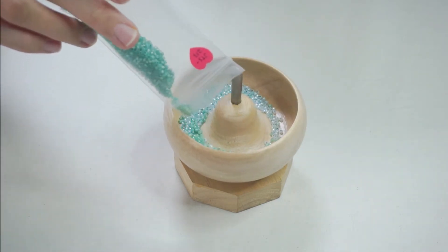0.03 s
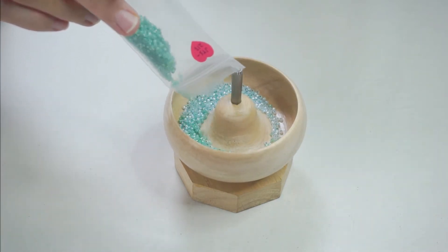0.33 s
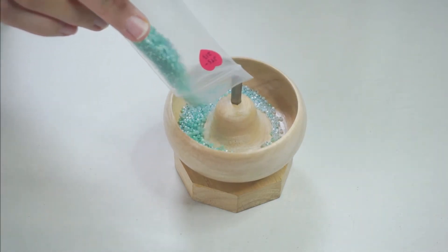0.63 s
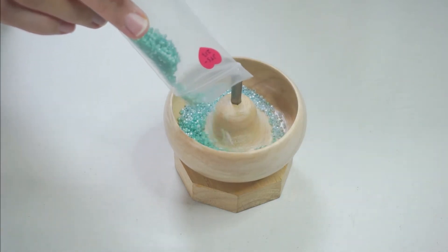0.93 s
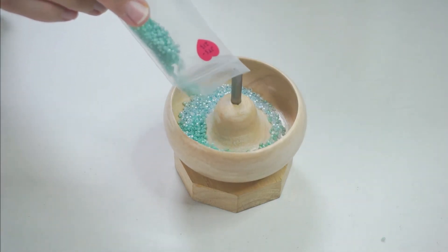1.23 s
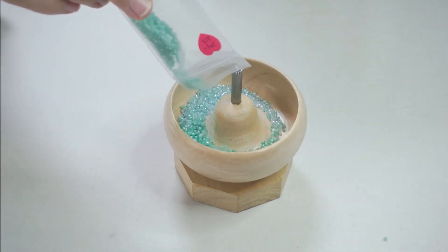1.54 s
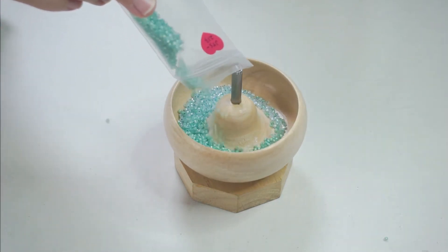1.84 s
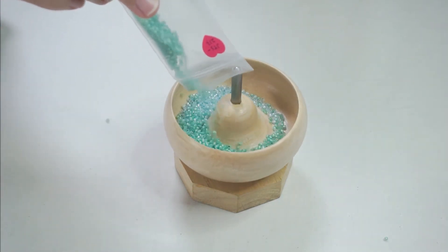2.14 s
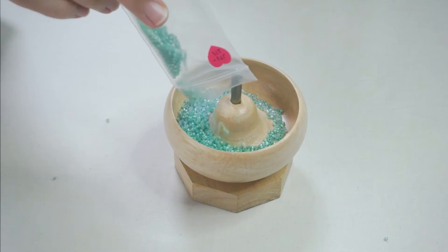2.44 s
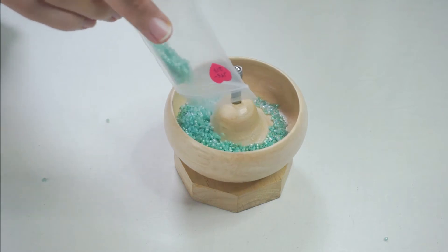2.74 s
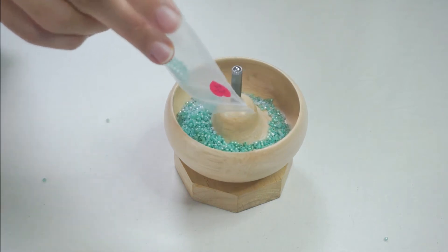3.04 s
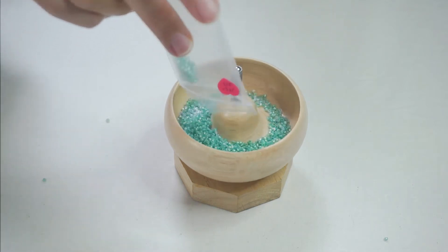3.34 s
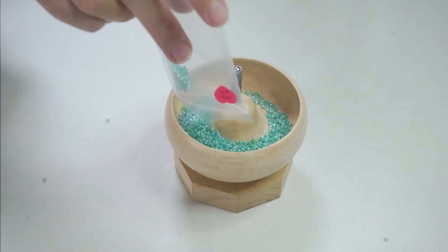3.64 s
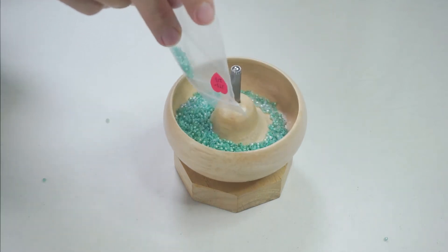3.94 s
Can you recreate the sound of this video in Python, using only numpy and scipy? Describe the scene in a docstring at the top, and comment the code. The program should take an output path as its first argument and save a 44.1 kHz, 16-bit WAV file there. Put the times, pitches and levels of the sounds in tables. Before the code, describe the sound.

Tiny glass beads knock on a wooden bowl and tick against each other, close to the microphone in a small room. A short pour leads to a longer one, which thins to scattered clicks and faint plastic bag crinkles.

```python
"""Glass beads poured into a wooden bowl.

Tiny beads fall from a plastic bag into a bowl on a spindle, close by in a small room. They knock on
the wood and tick against each other in two dense runs; the last are shaken out in small bunches while
the bag crinkles. Each contact rings wood or glass modes; two thin bowl tones linger underneath."""
import sys
import numpy as np
from scipy import signal
from scipy.fft import rfft, irfft, next_fast_len
from scipy.io import wavfile

SR = 44100
rng = np.random.default_rng(int(sys.argv[2]) if len(sys.argv) > 2 else 0)


def dump(signal):
    """Clip the signal to [-1, 1] and save it as 16-bit WAV at the path in sys.argv[1]."""
    limited = np.clip(np.atleast_2d(signal).T, -1, 1)
    pcm = np.round(limited * 32767).astype(np.int16)
    wavfile.write(sys.argv[1], SR, pcm)


N = 176400
TIME = np.arange(N) / SR
SIDES = np.array([[1], [-1]])  # left, right
STREAM_JOSTLE_DB, HIT_JOSTLE_DB = -4, -8.5


def from_db(db):
    """Decibels to gain."""
    return 10 ** (np.asarray(db) / 20)


def rms_one(x):
    """Scale to rms 1."""
    return x / np.sqrt(np.mean(x ** 2) + 1e-20)


def at_hz(table, hz, column=1):
    """Interpolate a table column over log frequency."""
    table = np.array(table)
    return np.interp(np.log(hz + 1), np.log(table[:, 0]), table[:, column])


def drift(rate_hz):
    """Smooth random wander, rms 1."""
    pole = np.exp(-2 * np.pi * rate_hz / SR)
    return rms_one(signal.lfilter([1], [1, -2 * pole, pole ** 2], rng.standard_normal(N + SR))[SR:])


def resonate(x, hz, width_hz):
    """Resonator that keeps the energy of a click."""
    radius = np.exp(-np.pi * width_hz / SR)
    feedforward = np.sqrt((1 - radius ** 2) / 2) * np.array([1, 0, -1])
    feedback = [1, -2 * radius * np.cos(2 * np.pi * hz / SR), radius ** 2]
    return signal.lfilter(feedforward, feedback, x + 1e-18)


def clicks(start_s, level_db):
    """Impulses; level is rms over 1 ms."""
    out = np.zeros(N)
    out[(start_s * SR).astype(int)] = from_db(level_db) * np.sqrt(SR / 1000)
    return out


def contacts(level_db, knocks_per_s=1700, ticks_per_s=2500, full_flow_db=-39, size_spread_db=3.5):
    """Random knock and tick impulses, rates given at full flow; more flow brings more and harder ones."""
    rate_share = 0.4  # part of a level change due to contact count
    flow = from_db(2 * rate_share * (level_db - full_flow_db))
    chance = np.clip(np.array([[knocks_per_s], [ticks_per_s]]) * flow / SR, 1e-5, 1)
    sizes = rms_one(from_db(size_spread_db * np.clip(rng.standard_normal(N), -2, 2)))
    sizes *= rng.choice([-1, 1], N)
    return (rng.random(N) < chance) * sizes * from_db(level_db) / np.sqrt(chance)


def jostle(drive, jostle_db, decay_s=0.0046):
    """Each contact briefly rattles the neighbouring beads."""
    pole = np.exp(-2 / (decay_s * SR))
    envelope = np.sqrt(signal.lfilter([1 - pole], [1, -pole], drive ** 2 + 1e-18))
    return drive + from_db(jostle_db) * envelope * rng.standard_normal(drive.shape)


def strike(train, modes, jostle_db, level_column=2, spread_db=3.5):
    """Contacts ring each mode at random strength. Output axes: shared/apart, left/right, time."""
    at = np.flatnonzero(train)
    out = np.zeros((2, 2, N))
    total = np.sqrt(sum(from_db(2 * mode[level_column]) for mode in modes))
    for k, mode in enumerate(modes):
        hz, width_hz, *_, fill_db_per_s, pan_db = mode
        draws = np.random.default_rng(rng.integers(2 ** 31)).standard_normal((len(at), 3))
        fill_db = fill_db_per_s * (TIME[at] - TIME[-1] / 2)  # timbre shifts as the bowl fills
        gain = (-1) ** k * from_db(mode[level_column] + fill_db) / total
        drive = np.zeros((2, N))
        drive[:, at] = gain * train[at] * rms_one(from_db(spread_db * draws[:, :2].T))
        drive[1, at] *= np.sign(draws[:, 2])  # decorrelates apart from shared
        ring = resonate(jostle(drive, jostle_db), hz, width_hz)
        ring = signal.lfilter(*signal.butter(2, hz / 2, "high", fs=SR), ring)
        out += ring[:, None] * rms_one(from_db(SIDES * pan_db / 2))
    return out


def wood_knocks(stream, landings, tap_top_hz=3400):
    """Beads knock on the bowl; soft taps ring only its low modes."""
    # bowl modes: pitch_hz, width_hz, stream_db, landing_db, fill_db_per_s, pan_db
    modes = [(372, 113, -29, -27.5, 0, 1), (486, 100, -24.5, -29, -0.5, 2), (928, 95, -14, -25, -0.7, 3),
             (1410, 138, -4.5, -17, -1, 4), (1780, 290, -2.5, -2.5, -0.5, 0),
             (2047, 266, 0.4, -0.5, 0.4, 1), (2460, 560, 1.55, 0.5, -0.5, 1.5),
             (3080, 510, -0.1, -9, 0.26, 6), (3945, 450, -3.5, -11, 0, 3), (4896, 820, -0.5, 1, 0.46, 6.5),
             (5510, 670, 0, 0.5, 0.63, 3.5), (6380, 670, -4, -1, -0.5, 6), (8170, 470, -5.5, -6, -0.5, 1)]
    # soft taps: start_s, level_db
    taps = [(3.57, -46), (3.678, -42), (3.690, -38.5), (3.7822, -38), (3.8862, -48), (3.9232, -45),
            (3.9659, -51), (3.9827, -37)]
    low_modes = [mode for mode in modes if mode[0] < tap_top_hz]
    tapped = strike(clicks(*np.transpose(taps)), low_modes, HIT_JOSTLE_DB, level_column=3)
    poured = strike(stream, modes, STREAM_JOSTLE_DB)
    return tapped + poured + strike(landings, modes, HIT_JOSTLE_DB, level_column=3)


def glass_ticks(stream, landings):
    """Bead hits bead and rings short, high modes."""
    # glass modes: pitch_hz, width_hz, level_db, fill_db_per_s, pan_db
    modes = [(7800, 3500, -1, 0, 1), (8560, 166, -4.5, -0.5, 1), (9040, 350, -1.5, -0.35, 2),
             (10020, 840, -3, -1, 4), (10540, 790, -2.5, -0.8, 3.5), (11400, 490, -4, 1.1, -1),
             (12840, 1160, -0.5, 1, 6), (14000, 980, -5.5, 1, 0), (15500, 2200, -3.5, 1, -9)]
    return strike(stream, modes, STREAM_JOSTLE_DB) + strike(landings, modes, HIT_JOSTLE_DB)


def bowl_colour(x):
    """The bowl radiates with narrow ringing peaks and dark gaps."""
    # peaks and gaps: centre_hz, width_hz, gain_db
    resonances = [(1260, 40, 4), (1472, 39, -3.5), (1643, 25, -3.5), (1697, 43, 4.5), (1762, 31, -11.5),
                  (1781, 28, 5.5), (1880, 20, 3), (2005, 35, 2), (2884, 19, 1), (2987, 37, 4),
                  (3846, 56, 3), (4204, 165, -6), (8830, 120, -1.5), (10775, 90, 3.5)]
    for hz, width_hz, db in resonances:
        zero_b, zero_a = signal.iirpeak(hz, hz / (width_hz * from_db(db / 2)), SR)
        pole_b, pole_a = signal.iirpeak(hz, hz / (width_hz * from_db(-db / 2)), SR)
        x = signal.lfilter(zero_a / (1 - zero_b[0]), pole_a / (1 - pole_b[0]), x)
    return x


def microphones(shared, apart):
    """Partly coherent pair; the right one hears the bowl slightly earlier."""
    # stereo image: frequency_hz, coherence, left_lag_rad
    image = [(200, 1, 0.27), (720, 0.65, 2.42), (1390, 0.96, 1.37), (2040, 0.89, 0.25), (2730, 0.99, 0.41),
             (3270, 0.44, 1.96), (4270, 0.19, 2.9), (4650, 0.99, 0.46), (6500, 0.76, 0.17), (8100, 1, 0.37),
             (10000, 1, .05), (12600, 0.98, 0.18), (13800, 0.84, 0.87), (15200, 1, .1)]
    size = next_fast_len(N + SR // 10)
    hz = np.arange(size // 2 + 1) * SR / size
    coherence, lag_rad = at_hz(image, hz), at_hz(image, hz, column=2)
    mid = np.sqrt((1 + coherence) / 2) * rfft(shared, size)
    side = np.sqrt((1 - coherence) / 2) * rfft(apart, size)
    return irfft((mid + SIDES * side) * np.exp(-0.5j * SIDES * lag_rad), size)[:, :N]


def beads(clump_db=0.78, clump_rate_hz=45, crack_band_hz=(4740, 8850)):
    """A clumpy stream and single hard landings drive wood and glass; landings open with a crack."""
    # stream envelope: time_s, knock_db, tick_db
    pour = [(0, -56.5, -54), (0.04, -54.5, -53.5), (0.09, -58.5, -54.5), (0.14, -52.5, -50),
            (0.25, -58, -53.5), (0.326, -58, -57), (0.336, -50.5, -50.5), (0.43, -47, -48.5),
            (0.58, -41.0, -42), (0.72, -35.5, -40), (0.81, -38.5, -39.5), (0.87, -38, -37.5),
            (1.0, -40, -39.5), (1.055, -48.5, -44.5), (1.11, -52, -43), (1.2, -51.5, -48.5),
            (1.25, -43.5, -44.5), (1.295, -49.0, -52), (1.31, -43.5, -45), (1.42, -40.0, -40),
            (1.75, -39.0, -40), (1.95, -39.5, -37.5), (2.069, -38.0, -37.5), (2.201, -39.0, -37.5),
            (2.3, -42.5, -41.0), (2.449, -39.0, -39.5), (2.561, -41, -43), (2.62, -38.0, -41.5),
            (2.69, -36, -41.0), (2.781, -39.5, -43.5), (2.86, -40.5, -44), (3.0, -47, -51),
            (3.06, -47, -49), (3.12, -50, -50.5), (3.24, -45, -49.5), (3.3, -48, -50), (3.339, -43, -46.5),
            (3.388, -49.5, -51.5), (3.488, -49, -45.5), (3.57, -55.5, -57), (3.658, -57, -58),
            (3.69, -53.5, -57), (3.79, -53.5, -53.5), (3.86, -60.5, -59.5), (4, -61, -66)]
    # hard landings: start_s, knock_db, tick_db
    hits = [(0.0064, -44, -46), (0.015, -52, -41.5), (0.0187, -50, -43), (0.038, -41.5, -44),
            (0.1246, -49, -47), (0.1313, -50, -50), (0.134, -54, -44.5), (0.145, -55, -50),
            (0.1826, -40, -63), (0.2216, -47, -53), (0.2715, -55, -48), (0.2875, -55, -43),
            (0.3313, -38.5, -45), (0.3346, -46, -45), (0.3466, -39, -40), (0.3673, -38, -50),
            (0.416, -39, -47), (0.4306, -36, -49), (0.438, -41, -49), (0.4606, -51, -51), (0.495, -40, -48),
            (0.6085, -37, -42), (0.6423, -35, -37), (0.6537, -35, -41), (0.705, -34.5, -46),
            (0.7228, -31, -39), (0.729, -41, -42), (1.005, -41, -38), (1.0265, -40, -35), (1.045, -42, -42),
            (1.1729, -38.5, -38.5), (1.2206, -36.5, -45.5), (1.2317, -38.5, -42), (1.239, -38, -44),
            (1.25, -42, -35), (1.3021, -34, -39), (1.3091, -33, -35), (1.354, -31.5, -41),
            (1.4267, -35, -35.5), (1.4395, -36.5, -31), (1.4705, -38, -32), (1.6797, -36.5, -32.5),
            (1.6907, -37, -35), (1.747, -39, -29), (1.8602, -36.5, -31.5), (1.8641, -35, -34),
            (2.0819, -32.5, -31), (2.1512, -39, -32), (2.1668, -37, -31), (2.182, -37, -33.5),
            (2.2134, -38.5, -32.5), (2.3006, -36.5, -37.5), (2.3072, -46, -33), (2.3283, -37, -38.5),
            (2.349, -28.5, -39.5), (2.356, -34.5, -34.5), (2.3946, -32.5, -37), (2.4462, -32.5, -32),
            (2.4587, -30, -30), (2.4985, -28, -34.5), (2.5245, -36, -38.5), (2.5541, -35, -37),
            (2.5812, -30.5, -39), (2.631, -30, -40), (2.637, -37, -35), (2.6424, -33, -36),
            (2.692, -36.5, -38.5), (2.7004, -30.5, -38), (2.706, -31, -34.5), (2.797, -35.5, -40.5),
            (2.804, -33.5, -39.5), (2.8147, -28.5, -45), (2.8714, -28.5, -40), (2.881, -33, -43),
            (2.9431, -36, -47), (2.947, -34.5, -35.5), (2.9771, -35.5, -36.5), (2.9877, -38, -42.5),
            (2.9982, -32.5, -40), (3.011, -43, -51), (3.0191, -32.5, -50), (3.0372, -27.5, -35.5),
            (3.0512, -32.5, -38), (3.0927, -42, -50), (3.109, -37, -41), (3.1386, -41, -41),
            (3.1712, -40.5, -45.5), (3.1766, -38.5, -45), (3.2027, -34, -46), (3.2081, -32.5, -47),
            (3.2148, -32, -45), (3.2293, -30.5, -45), (3.2346, -33, -41), (3.243, -31, -37),
            (3.2717, -32, -40), (3.2896, -34.5, -44), (3.3232, -29.5, -39), (3.3373, -30, -42),
            (3.3472, -31.5, -39), (3.3663, -33.5, -46), (3.4228, -44, -43), (3.445, -44.5, -44),
            (3.4633, -36, -40), (3.496, -34.5, -40), (3.5051, -39, -49), (3.5372, -37, -50),
            (3.606, -30.5, -42.5), (3.6132, -47.5, -49), (3.649, -56, -48.5), (3.6663, -51.5, -45),
            (3.678, -42, -48), (3.7078, -41.5, -47), (3.7372, -35, -43.5), (3.7446, -41, -40),
            (3.775, -36, -43), (3.782, -35.5, -48), (3.7991, -55, -48), (3.8209, -54, -47),
            (3.8426, -52, -57.5)]
    time_s, *curves_db = np.transpose(pour)
    level_db = np.array([np.interp(TIME, time_s, db) for db in curves_db])
    level_db += clump_db * drift(clump_rate_hz)
    knocks, ticks = contacts(level_db) * from_db([[-0.95], [-0.78]])
    start_s, knock_db, tick_db = np.transpose(hits)
    hard_knocks, hard_ticks = clicks(start_s, knock_db + 1.5), clicks(start_s, tick_db + 4.5)
    struck = wood_knocks(knocks, hard_knocks) + glass_ticks(ticks, hard_ticks)
    crack = from_db(-11) * signal.lfilter(*signal.butter(2, crack_band_hz, "band", fs=SR), hard_knocks)
    return microphones(*bowl_colour(struck)) + crack


def bowl_rings(t60_s=5.6, damped_at_s=0.13, release_s=0.012, waver_hz=5.08, flicker_db=2.5):
    """The bowl rings on its spindle: a first touch, soon damped, then swells with the pour."""
    # long rings: pitch_hz, swell_offset_db, touch_db
    rings = [(912, -4, -66), (1087, 1, -60.5)]
    # swell envelope: time_s, level_db
    swells = [(0.33, -88), (0.36, -62), (0.44, -78), (0.56, -73), (0.68, -68), (0.77, -70), (0.92, -70),
              (1.14, -91), (1.24, -66.5), (1.37, -66), (1.64, -82), (1.95, -68), (2.3, -84), (2.56, -75),
              (2.68, -63), (2.87, -75), (3.26, -75.5), (3.45, -89), (3.6, -72.5), (3.77, -75),
              (3.87, -82.5)]
    touch = from_db(-60 * TIME / t60_s) * np.exp(-np.maximum(TIME - damped_at_s, 0) / release_s)
    swell_db = np.interp(TIME, *np.transpose(swells))
    out = np.zeros(N)
    for hz, offset_db, touch_db in rings:
        phase = 2 * np.pi * hz * TIME
        waver_rad = 2 * np.pi * waver_hz * np.cumsum(drift(rate_hz=15.4)) / SR
        swell = np.sqrt(2) * from_db(swell_db + offset_db + flicker_db * drift(rate_hz=15.4))
        out += swell * np.sin(phase + waver_rad) + from_db(touch_db) * touch * np.sin(phase)
    return out


def hiss(level_db=-59.5, coherence=0.28):
    """Faint steady background hiss."""
    # noise spectrum: frequency_hz, density_db
    spectrum = [(30, -38), (90, -30.5), (160, -25), (280, -17.5), (420, -10), (700, -10.5), (1080, -6.5),
                (1500, -7.5), (2200, -12), (3100, -6.5), (4200, -27.5), (5200, -15), (7000, -20.5),
                (9100, -12), (12500, -12), (15500, -25)]
    white = np.sqrt(coherence) * rng.standard_normal(N)
    white = white + np.sqrt(1 - coherence) * rng.standard_normal((2, N))
    shape = from_db(at_hz(spectrum, np.arange(N // 2 + 1) * SR / N))
    return from_db(level_db) * rms_one(irfft(rfft(white) * shape, N))


def bag(decay_s=0.0019, band_hz=(8500, 16100), pan_db=2, stereo_spread=0.75):
    """Plastic film buckles in short, bright snaps."""
    # snaps: start_s, level_db
    crinkles = [(1.1076, -42), (1.148, -42), (1.1620, -32), (3.2568, -33), (3.4297, -33), (3.4783, -32),
                (3.485, -32.5), (3.487, -36), (3.601, -28.5)]
    envelope = sum(from_db(db + 4) * (TIME >= start_s) * np.exp(-np.abs(TIME - start_s) / decay_s)
                   for start_s, db in crinkles)
    grit = rms_one(rng.choice([-1, 1], N) + stereo_spread * rng.choice([-1, 1], (2, N)))
    snaps = signal.lfilter(*signal.butter(2, band_hz, "band", fs=SR), grit * envelope)
    return snaps * from_db(SIDES * pan_db / 2)


def room(x, level_db=-3.5, t60_s=0.13, delay_s=0.004, lowpass_hz=10700, places=3):
    """Short diffuse tails, one per side and landing place; the landing place wanders."""
    t = TIME[:SR // 2]
    tails = rng.standard_normal((places, 2, len(t))) * (t > delay_s) * from_db(-60 * t / t60_s)
    tails = signal.lfilter(*signal.butter(1, lowpass_hz, fs=SR), rms_one(tails) / np.sqrt(len(t)))
    shares = np.array([drift(rate_hz=23.2) for _ in tails])
    shares /= np.linalg.norm(shares, axis=0)
    wet = sum(signal.fftconvolve(x * share, tail, axes=1)[:, :N] for share, tail in zip(shares, tails))
    return from_db(level_db) * wet


def scene():
    """Beads, bowl and bag in the room, over hiss."""
    near = beads() + bowl_rings() + bag()
    return near + room(near) + hiss()


def record(dry):
    """Steep low-pass."""
    cutoff_hz = 15850
    return signal.sosfilt(signal.ellip(12, 0.1, 80, cutoff_hz, fs=SR, output="sos"), dry)


dry = scene()
out = record(dry)
dump(out)
```